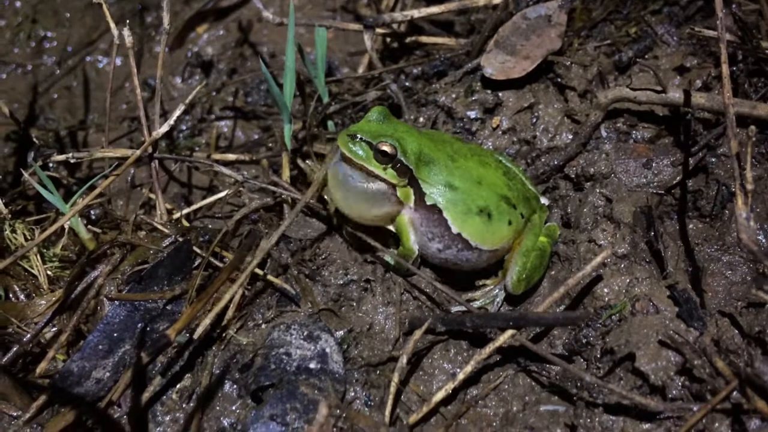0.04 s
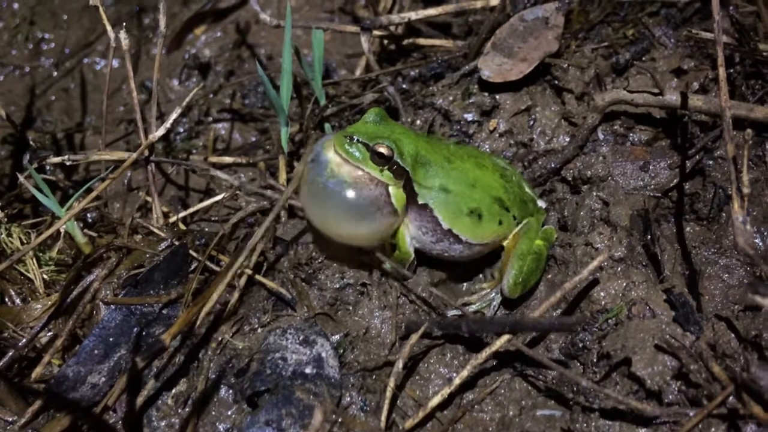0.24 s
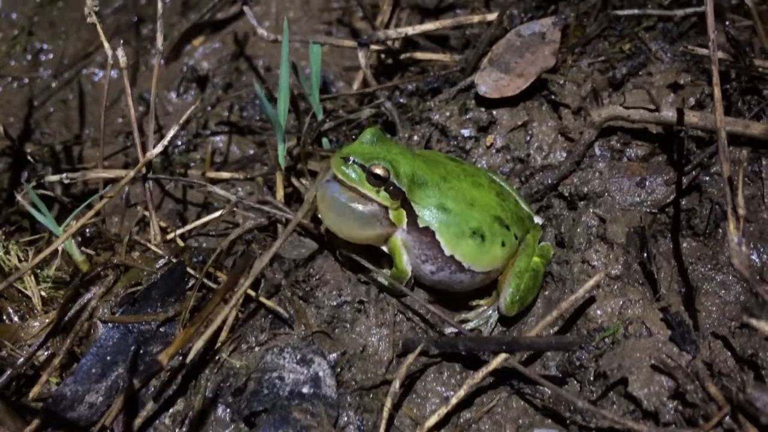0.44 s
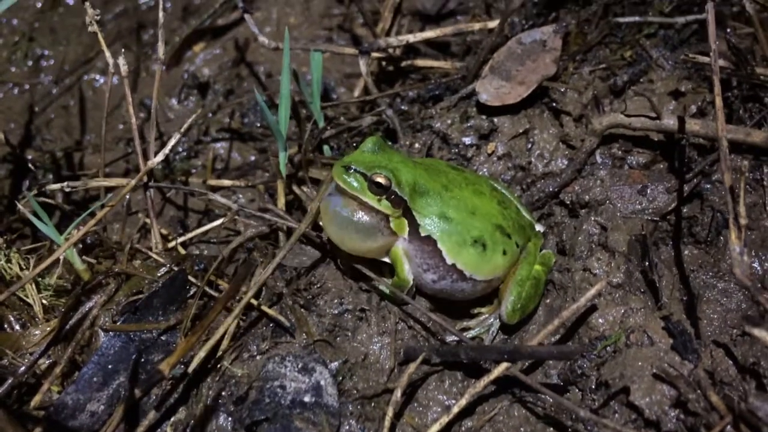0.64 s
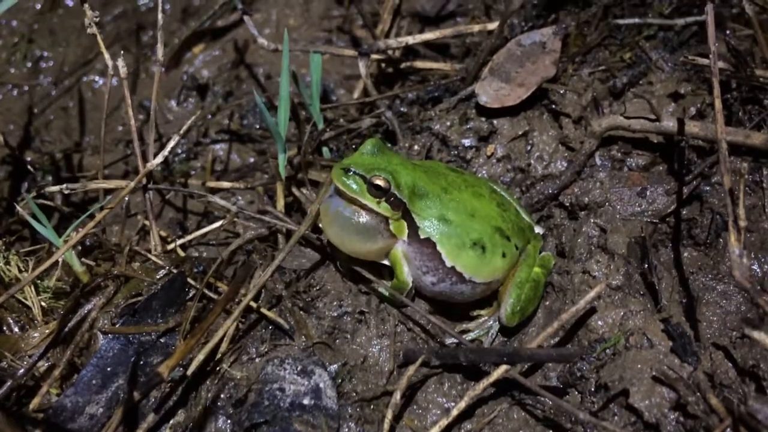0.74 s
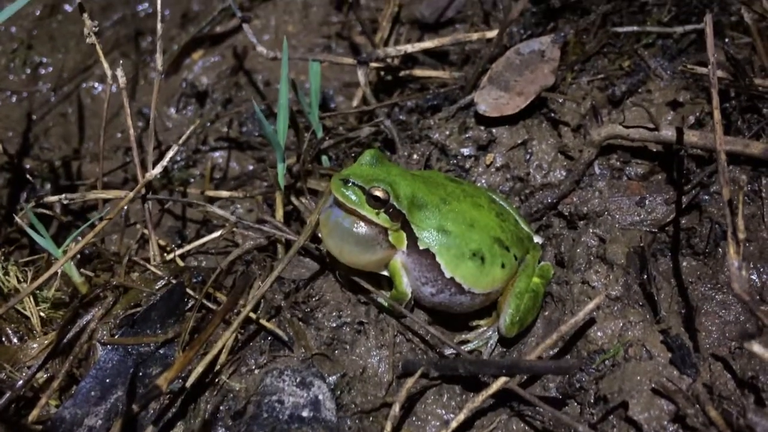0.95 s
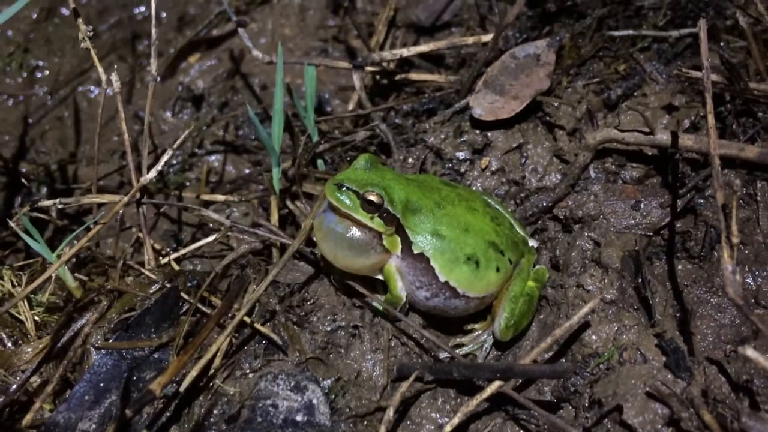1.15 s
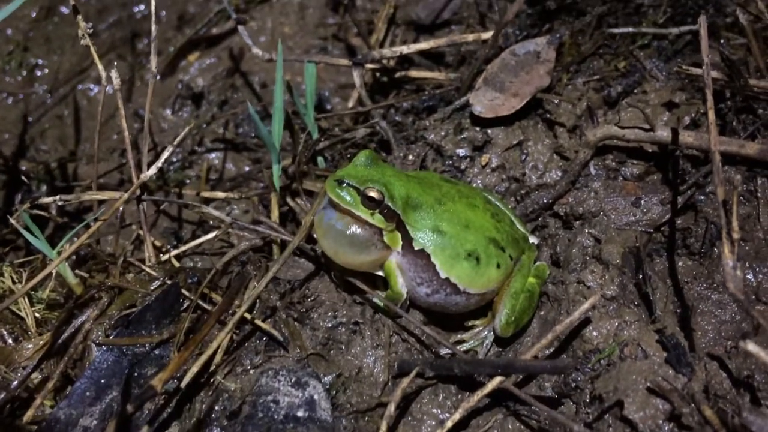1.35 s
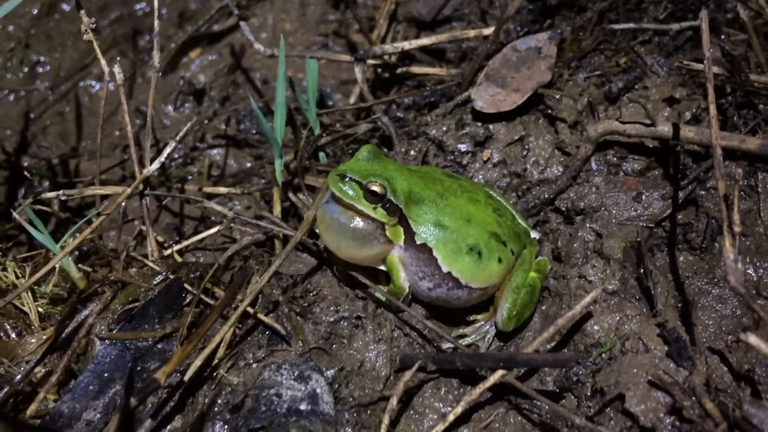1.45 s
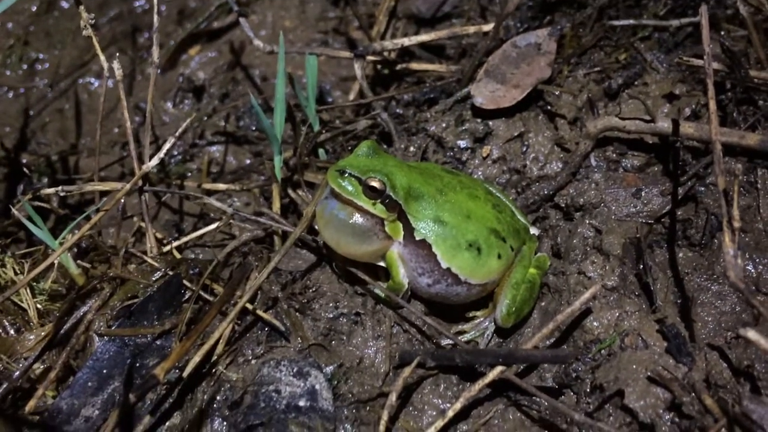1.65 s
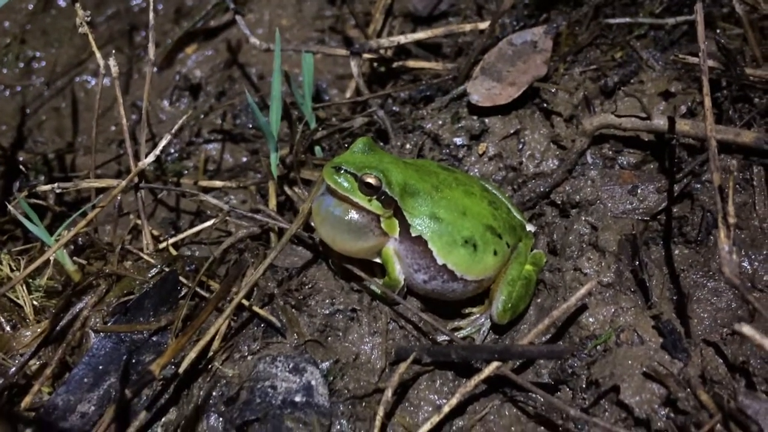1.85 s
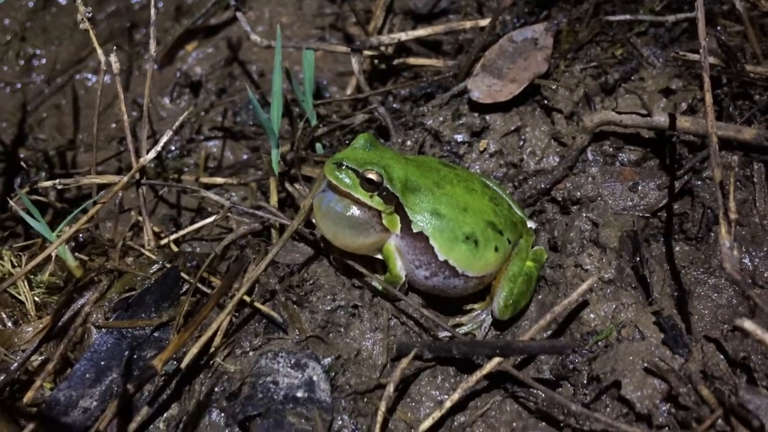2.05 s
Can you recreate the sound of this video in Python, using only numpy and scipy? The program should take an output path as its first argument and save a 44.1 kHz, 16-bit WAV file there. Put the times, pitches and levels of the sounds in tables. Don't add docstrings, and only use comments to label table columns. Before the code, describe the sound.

Distant frogs chatter softly outdoors, then one near frog bursts out with a short, harsh, slightly distorted croak. Moments later the background chorus jumps up in level and continues, with faint hiss and light breeze rumble.

```python
import sys
import numpy as np
from scipy import signal
from scipy.fft import rfft, irfft, next_fast_len
from scipy.io import wavfile
from scipy.ndimage import uniform_filter1d

SR = 44100
rng = np.random.default_rng(int(sys.argv[2]) if len(sys.argv) > 2 else 0)


def how_loud(loudness_db):
    steps = np.asarray(loudness_db, float) / 20
    return 10 ** steps


def transcribe(signal):
    frames = np.atleast_2d(signal).T
    limited = np.clip(frames, -1, 1)
    pcm = np.round(limited * 32767).astype(np.int16)
    wavfile.write(sys.argv[1], SR, pcm)


N = 92610


def unit(x):
    return x / np.sqrt(np.mean(x ** 2) + 1e-20)


def filtered(x, response):
    size = next_fast_len(N + SR // 2)
    hz = np.fft.rfftfreq(size, 1 / SR)
    return irfft(rfft(x, size) * response(hz), size)[:N]


def flutter(shape, size):
    x = rng.standard_normal(shape)
    for _ in range(3):
        x = uniform_filter1d(x, size, 1)
    return x


def curve(table):
    s, db = np.transpose(table)
    return how_loud(np.interp(np.arange(N) / SR, s, db))


def echo(x, db, t60):
    t = np.arange(SR // 4) / SR
    tail = rng.standard_normal(len(t)) * how_loud(-60 * t / t60)
    tail = tail / np.linalg.norm(tail)
    late = np.pad(x, (90, 0))
    return x + how_loud(db) * signal.fftconvolve(late, tail)[:N]


def rush(spectrum, patchy_db):
    z = signal.stft(rng.standard_normal(N + 512), nperseg=256)[2]
    patches = uniform_filter1d(rng.standard_normal(z.shape), 3, 0)
    patches = uniform_filter1d(patches, 12, 1)
    x = signal.istft(z * how_loud(patchy_db * unit(patches)), nperseg=256)[1][:N]
    f, db = np.transpose(spectrum)
    return unit(filtered(x, lambda hz: how_loud(np.interp(np.log(hz + 1), np.log(f), db, -120, -120))))


def bursts(s, hz, db, hold_ms, full):
    # multiple, slack_sac_db, full_sac_db, ring_t60_ms
    tones = [(1, 0, -14, 9), (2, -5, 0, 11.5), (3, -2, -25, 5), (4, -34, -31, 5), (5, -32, -29, 6),
             (6, -70, -21, 4), (7, -75, -36, 4), (9, -90, -38, 4), (10, -90, -39, 4)]
    rise_ms, low_cut_hz = .65, 934
    low_top_hz = 1365
    waver, slip = .006, .35
    slack_ring = .5
    rasp_depth, scatter_db = .07, .8
    short_low = .65
    third_fades = 6

    t = np.arange(SR // 40)[None] / SR
    s = np.round(s * SR) / SR
    pulses = (len(s), 1)
    travelled = np.cumsum(np.diff(s, prepend=s[0]) * np.roll(hz, 1))
    hz, db, hold_ms, travelled = [np.asarray(v)[:, None] for v in (hz, db, hold_ms, travelled)]
    full = np.clip(np.asarray(full)[:, None], 0, 1)

    drift = np.cumsum(flutter((len(s), t.size), size=12), 1) * waver
    turn = 2 * np.pi * hz * t + drift
    carried = 2 * np.pi * travelled + slip * rng.standard_normal(pulses)
    rise = 1 - np.exp(-(t * 1000 / rise_ms) ** 2)
    ring = slack_ring + (1 - slack_ring) * full
    out = 0
    for k, slack_db, full_db, t60 in tones:
        hold = hold_ms
        phase = k * (turn + carried)
        if k == 1:
            hold = hold_ms * (1 - short_low * full)
            phase = turn * np.minimum(low_top_hz / hz, 1)
        after = np.maximum(t * 1000 - hold, 0) / ring
        slack = (1 - full) ** (third_fades if k == 3 else 1)
        level = full_db + (slack_db - full_db) * slack
        level = level + scatter_db * np.sqrt(k) * rng.standard_normal(pulses)
        rasp = 1 + rasp_depth * k * (0.6 + .6 * full) * unit(flutter(turn.shape, size=8))
        out = out + how_loud(level - 60 * after / t60) * rasp * np.sin(phase)

    out = out * rise * how_loud(db)
    at = np.round(s[:, None] * SR).astype(int) + np.arange(t.size) + SR
    out = np.bincount(at.ravel(), out.ravel(), N + 3 * SR)[SR:SR + N]
    return filtered(out, lambda f: 1 / (1 + (low_cut_hz / (f + 1)) ** 8))


def neighbours():
    # start_s, top_pitch_hz, level_db
    frogs = [(0.032, 1540, -27), (.43, 1540, -28), (.79, 1550, -26), (1.171, 1560, -26), (1.541, 1550, -25),
             (1.932, 1550, -26.5), (0.099, 1440, -25.5), (.48, 1440, -27.5), (.87, 1450, -25.5),
             (1.23, 1440, -26.5), (1.599, 1450, -24.5), (1.989, 1450, -24), (0.048, 1330, -22),
             (0.469, 1330, -25.5), (0.891, 1330, -25.5), (.96, 1354, -30), (1.309, 1330, -27.5),
             (1.729, 1330, -26.5), (-.06, 1380, -25.5), (.57, 1369, -24), (.26, 1380, -29),
             (.685, 1396, -27), (1.09, 1401, -25.5), (1.36, 1390, -24), (1.775, 1390, -25),
             (.78, 1330, -29), (1.13, 1360, -25.5), (1.491, 1370, -22.5), (1.909, 1380, -23)]
    call_s, pulse_rate_hz, swell_s, hold_ms = 0.14, 110, 0.029, 2.66
    start_pitch, glide_s = .84, .05
    u = np.arange(18) / pulse_rate_hz
    up = 1 - np.exp(-u / glide_s)
    stop_db = 600 * np.maximum(u - call_s + 0.024, 0)
    out = 0
    for start, hz, db in frogs:
        pace = 1 + .06 * rng.standard_normal()
        s = start + u * pace + .0005 * rng.standard_normal(len(u))
        level = db - 7 * np.exp(-u / swell_s) - stop_db + 0.5 * rng.standard_normal(len(u))
        pitch = hz * (start_pitch + (1 - start_pitch) * up)
        call = bursts(s, pitch, level, np.full(len(u), hold_ms), full=0.21 + 0.54 * up)
        out = out + echo(call, db=-2, t60=0.13)
    return filtered(out, lambda f: 1 / (1 + (f / 7200) ** 6) * (f < 9000))


def far_crowd():
    # pitch_hz, level_db (per Hz)
    main_bands = [(410, -38.5), (700, -59.5), (908, -26.5), (1120, 2), (1470, -12.5), (1940, -22),
                  (2660, 2), (3100, -15), (3600, -23.5), (4680, -59), (7920, -120)]
    # pitch_hz, level_db (per Hz)
    upper_bands = [(2500, -22), (3300, 1.5), (4280, -4), (4840, -21), (6800, 0), (7300, -13), (7600, -36),
                   (9000, -50.5)]
    patchy_db = 3
    return how_loud(-38.5) * rush(main_bands, patchy_db) + how_loud(-57) * rush(upper_bands, patchy_db)


def night_air():
    # pitch_hz, level_db (per Hz)
    hiss = [(700, -120), (900, -13), (2000, -6), (8000, -22.5), (11000, -20), (15500, -15.5)]
    return how_loud(-70.5) * rush(hiss, patchy_db=6.5)


def breeze():
    # pitch_hz, level_db (per Hz)
    rumble = [(15, -36.5), (30, -13), (60, -1), (150, -5), (400, -8.5), (900, -12.5), (1500, -120)]
    # start_s, level_db
    strength = [
        (0, -76),
        (.9, -73.5),
        (1.1, -70),
        (1.6, -68.5),
        (2.1, -69),
    ]
    return curve(strength) * rush(rumble, patchy_db=4)


def near_frog():
    # start_s, pulses_gone_by
    beat = [(.231, 0), (.2378, 1), (.2653, 4), (.2977, 8), (.3612, 16), (.384, 19), (.3995, 21)]
    # start_s, cord_pitch_hz, level_db, burst_hold_ms, sac_filling (0-1)
    croak = [
        (.231, 1000, -21, .5, .1),
        (.238, 1090, -14, 2.2, 0),
        (.248, 1200, -5, 2.2, .2),
        (.266, 1295, -3.5, 2.2, .5),
        (.298, 1358, -2.5, 3.5, 1),
        (.33, 1394, -1, 3.9, 1),
        (.385, 1426, -3, 2.5, .72),
        (.392, 1426, -10, 2, .35),
        (.4, 1428, -24, 2.5, .4),
    ]
    # delay_s, level_db
    echoes = [
        (.0045, -26),
        (.011, -29),
        (.023, -38),
    ]
    when, count = np.transpose(beat)
    s = np.interp(np.arange(count[-1] + 1), count, when)
    at, *columns = np.transpose(croak)
    x = bursts(s, *[np.interp(s, at, column) for column in columns])
    x = x + sum(how_loud(db) * np.roll(x, round(delay * SR)) for delay, db in echoes)
    return echo(x, db=-22, t60=.035)


def gain_control():
    # start_s, level_db
    gain = [
        (0, -12.5),
        (.42, -8.5),
        (0.601, -12.5),
        (.67, -15),
        (0.701, -3.5),
        (0.752, -0.5),
        (2.1, -3),
    ]
    return curve(gain)


def scene():
    background = neighbours() + far_crowd() + night_air() + breeze()
    return (near_frog() + gain_control() * background)[None]


def band_limit(x):
    return signal.sosfilt(signal.butter(12, 15740, fs=SR, output="sos"), x)


def record(dry):
    top, knee = .72, 6
    lopsided, pump_hz, high_cut_hz = 1.67, 117, 14700
    x = dry[0] / (1 + np.abs(dry[0] / top) ** knee) ** (1 / knee)
    pump = filtered(x ** 6, lambda f: (f / pump_hz) ** 3 / (1 + (f / pump_hz) ** 5.7))
    x = filtered(x + lopsided * pump, lambda f: 1 / (1 + (f / high_cut_hz) ** 40))
    return band_limit(x[None])


dry = scene()
out = record(dry)
transcribe(out)
```